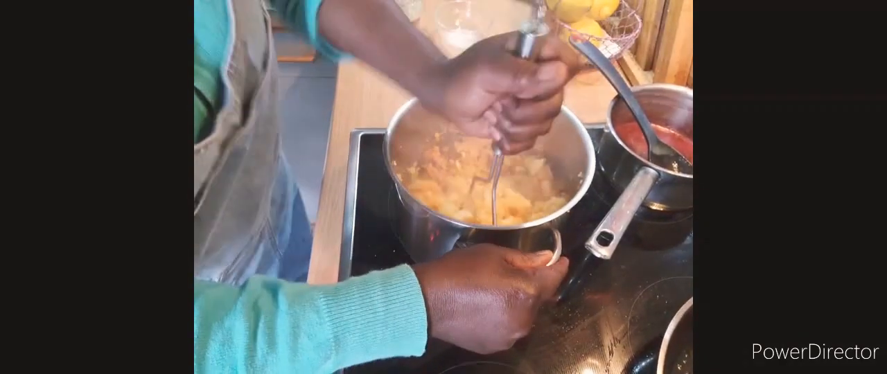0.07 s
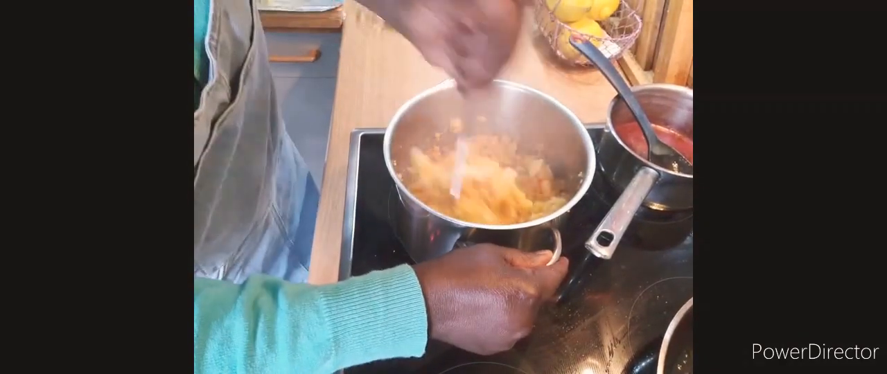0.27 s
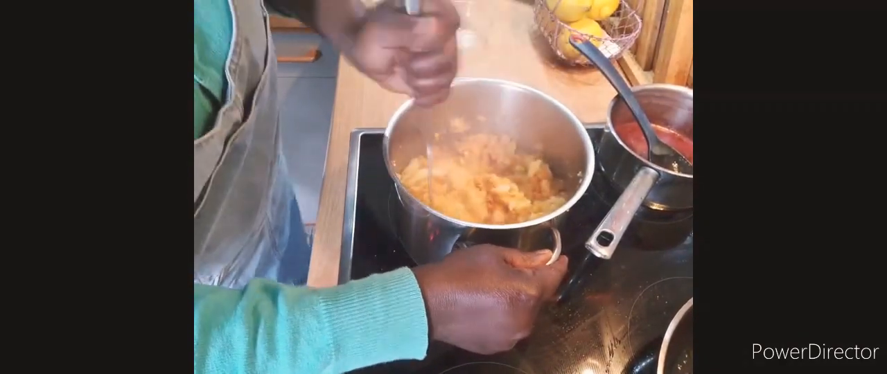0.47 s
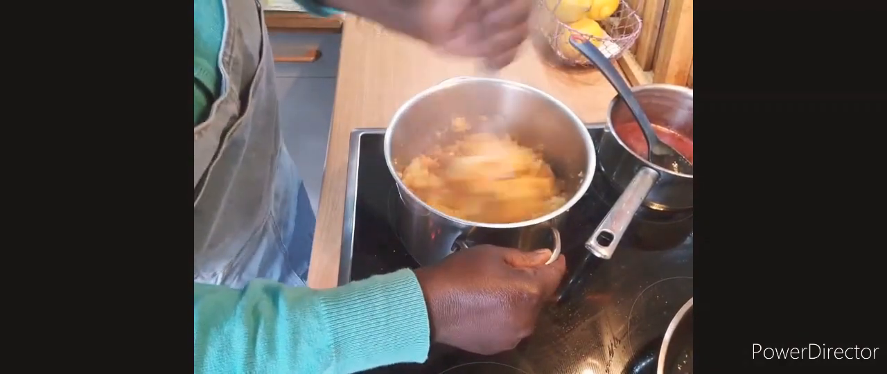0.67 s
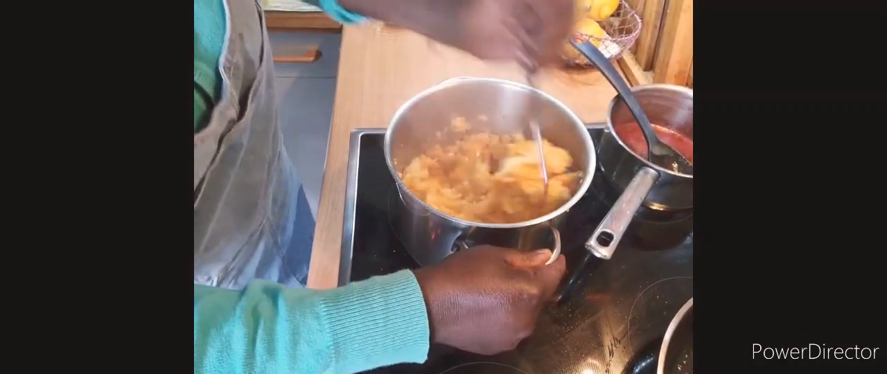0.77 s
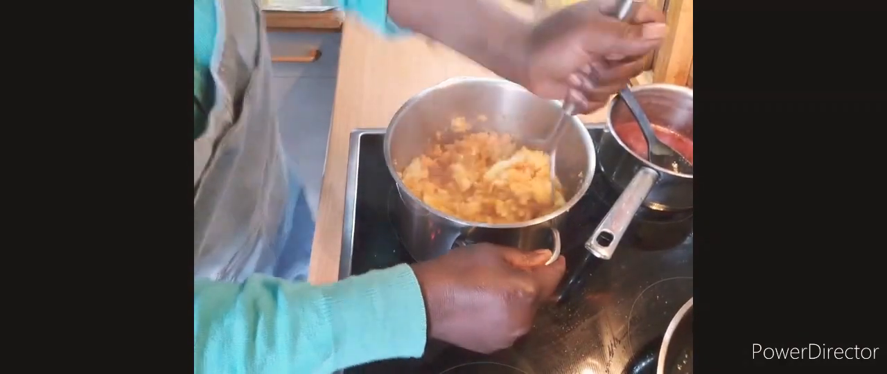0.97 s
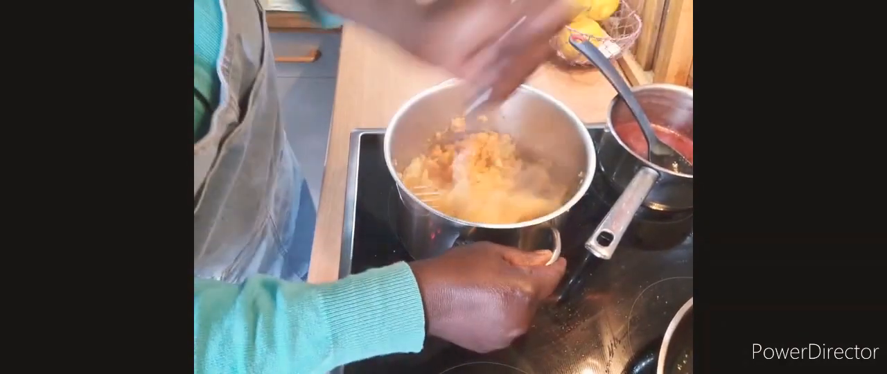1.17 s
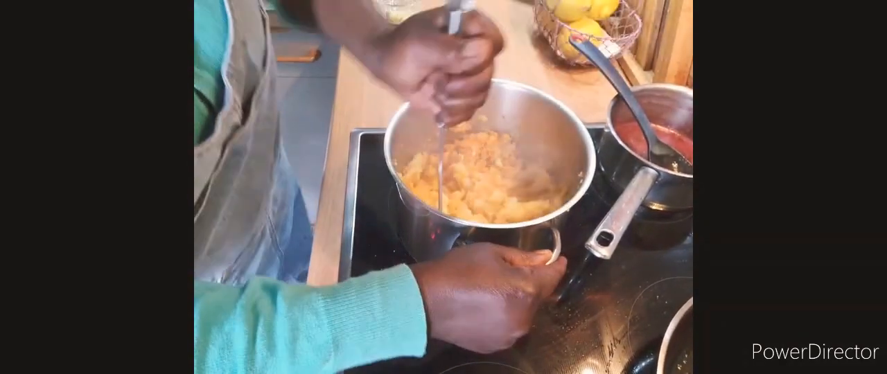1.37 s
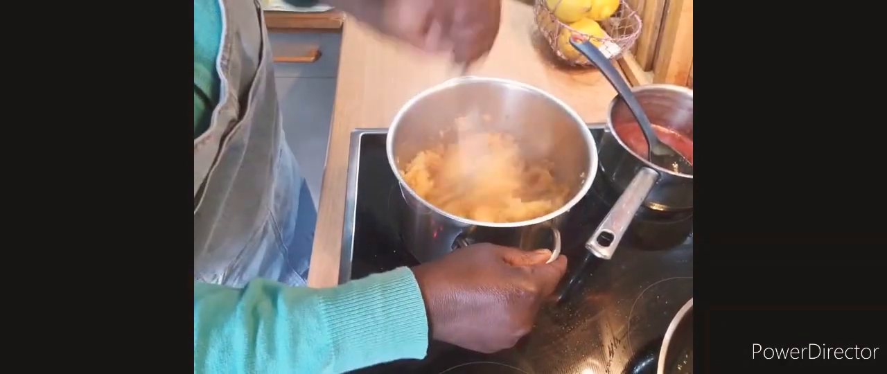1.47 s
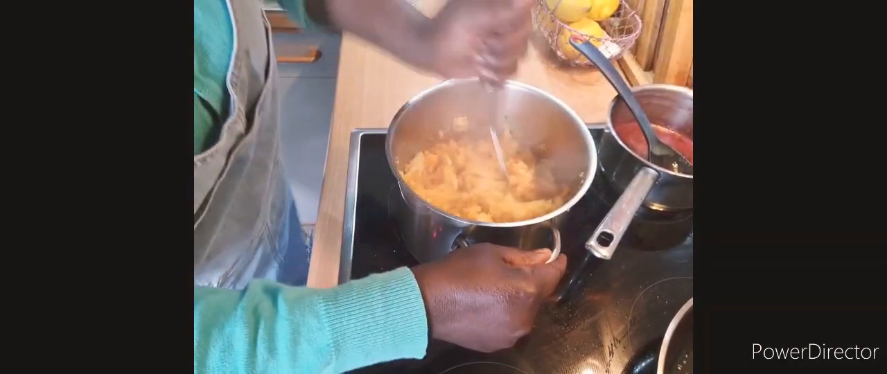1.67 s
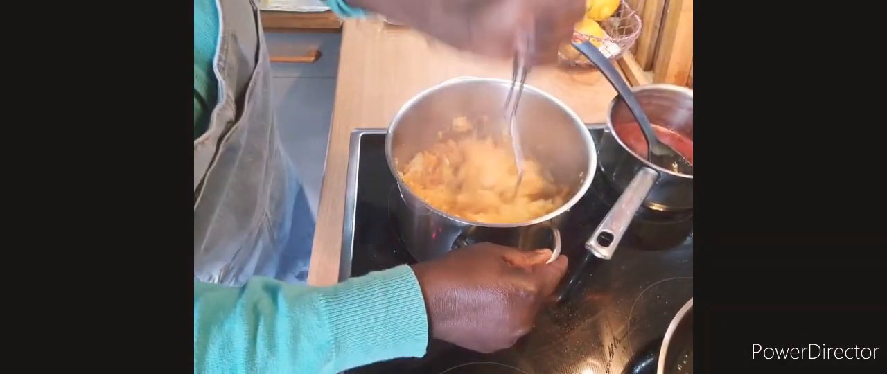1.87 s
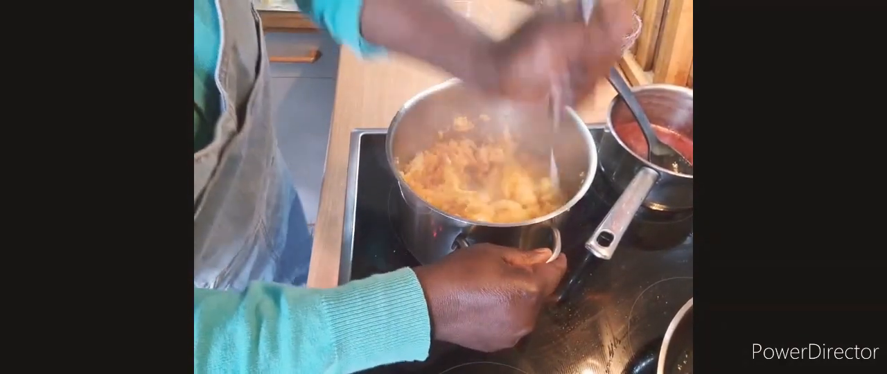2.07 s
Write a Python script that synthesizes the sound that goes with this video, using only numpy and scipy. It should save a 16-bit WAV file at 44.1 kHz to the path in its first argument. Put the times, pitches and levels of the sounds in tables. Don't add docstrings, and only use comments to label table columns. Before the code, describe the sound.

A hand masher pounds cooked vegetables in a steel pot, clanking the wall and thudding the bottom

```python
import sys
import numpy as np
from scipy import signal
from scipy.fft import rfft, irfft
from scipy.io import wavfile
from scipy.ndimage import uniform_filter1d, map_coordinates

SR = 44100
rng = np.random.default_rng(int(sys.argv[2]) if len(sys.argv) > 2 else 0)


def volts(x):
    e = np.asarray(x, float) / 20
    return 10 ** e


def bounce(signal):
    frames = np.transpose(np.atleast_2d(signal))
    limited = np.clip(frames, -1, 1)
    pcm = np.round(limited * 32767).astype(np.int16)
    wavfile.write(sys.argv[1], SR, pcm)


N = 93888
T = np.arange(N) / SR
PATCHY_DB = 4

# start_s, level_db, contact_s, thump_db, mash_hiss_db
BOTTOM_HITS = [
    (0.0627, -7.5, 0.0063, -11.5, -30),
    (0.5026, -14.5, 0.006, -12.5, -18),
    (0.9227, -6, 0.0079, -5.5, -28.5),
    (1.3144, -15.5, 0.0061, -10.5, -19.5),
    (1.761, -13, 0.008, -17, -26),
]
# freq_hz, density_db (per Hz)
RUB_COLOUR = [(60, 1), (150, -2), (600, -3.5), (1500, -16), (3000, -3.5), (5000, -8.5), (7200, -10),
              (14000, -7)]


def unit(x):
    return x / np.sqrt(np.mean(x ** 2))


def noise(colour):
    hz, db = np.array(colour).T
    f = np.maximum(np.arange(N // 2 + 1) * SR / N, 1)
    gain = volts(np.interp(np.log(f), np.log(hz), db))
    return unit(irfft(rfft(rng.standard_normal(N)) * gain, N))


def topped(colour, top_db):
    return [(hz, db + top_db * (hz > 8000)) for hz, db in colour]


def walk(rate_hz):
    k = int(SR / rate_hz)
    return uniform_filter1d(np.repeat(rng.standard_normal(N // k + 1), k), k)[:N]


def fade(s, tau, rise=0.00027):
    u = np.maximum(T - s, 0)
    return (1 - np.exp(-u / rise)) * np.exp(-u / tau)


def hold(s, length, rise, end):
    return np.clip((T - s) / rise, 0, 1) * np.exp(-np.maximum(T - s - length, 0) / end)


def ring(x, peaks):
    out, total = 0, 0
    for hz, width, db in peaks:
        mode = signal.lfilter(*signal.iirpeak(hz, hz / width, SR), x)
        out = out + volts(db + PATCHY_DB * walk(39.96)) * mode
        total += width * volts(2 * db)
    return out * np.sqrt(SR / np.pi / total)


def strike(s, contact, peaks, rise, cycles=0.):
    out, a = np.zeros(N), int(s * SR)
    u = np.maximum(T[a:a + SR // 4] - s, 0)
    for hz, width, db in peaks:
        drift = np.cumsum(uniform_filter1d(rng.standard_normal(SR // 4), size=40))[:len(u)]
        waver = drift * np.sqrt(2 * np.pi * width / SR)
        swell = 1 - np.exp(-u / (rise + cycles / max(hz, 600)))
        decay = np.exp(-u / (contact + 1 / (np.pi * width)))
        out[a:a + len(u)] += volts(db) * swell * decay * np.sin(2 * np.pi * hz * u + waver)
    return out * np.sqrt(2 / sum(volts(2 * db) for _, _, db in peaks))


def blow(s, db, contact, peaks, top_db):
    # freq_hz, density_db (per Hz)
    crack_colour = [(60, -33.5), (150, -36.5), (700, -23.5), (1800, -8.5), (3500, -7.5), (7200, -1),
                    (9000, -2.5), (14000, -1.5)]
    crack = fade(s, contact) * noise(topped(crack_colour, top_db))
    steel = strike(s, contact / 2, peaks, rise=0.00047, cycles=2)
    return volts(db) * (crack + volts(1.5) * steel)


def knocks():
    # start_s, level_db, contact_s, scrape_db, scrape_length_s
    wall_hits = [
        (0.448, -1.5, 0.009, -22.5, 0.064),
        (0.845, -7, 0.0046, -25.5, 0.13),
        (1.2165, -2, 0.0051, -16.5, 0.094),
        (1.2455, -5, 0.0058, -51, 0.026),
        (1.6087, -3.5, 0.0047, -16.5, 0.1417),
        (2.0453, -3.5, 0.0067, -20.5, 0.07),
    ]
    # freq_hz, width_hz, level_db
    wall_modes = [
        [(631, 34, -7), (1110, 63, 6.5), (2656, 147, -8), (3210, 90, -22), (3790, 100, -7), (5380, 220, 0),
         (7550, 920, -8)],
        [(130, 34, -14), (878, 82, -1), (1063, 50, 3), (1616, 53, -7.5), (3190, 110, -3.5), (3767, 120, 1.5),
         (5000, 460, -21.5)],
        [(1740, 270, -3.5), (2900, 260, 4), (3844, 250, 1.5), (4820, 620, -1), (7280, 270, 5.5)],
        [(800, 180, -13), (1067, 77, 1), (2414, 150, -4), (2900, 55, -19.5), (3550, 250, -6), (7200, 370, 1)],
        [(147.6, 79, -7), (608, 69, -11), (1980, 80, -8.5), (2900, 167, 0.5), (3880, 214, -2.5),
         (4240, 120, -12), (6970, 170, 2.5)],
        [(130, 140, -9.5), (610, 150, -8), (812, 94, -5), (1339, 210, 1.5), (2182, 136, -6.5),
         (3930, 180, -2.5), (6350, 1200, 0.5)],
    ]
    # freq_hz, width_hz, level_db
    scrape_modes = [
        [(627, 78, -3), (1133, 72, -5.5), (2900, 380, -5), (3700, 200, -8), (5600, 270, -10.5),
         (7330, 430, -6.5)],
        [(450, 150, 3.5), (900, 250, 1.5), (1500, 250, -3), (3000, 300, -8), (3800, 250, -6), (7200, 600, -8)],
        [(880, 410, -7.5), (1750, 240, -3.5), (2900, 380, -0.5), (3500, 200, -2), (6500, 300, 1)],
        [(1000, 200, 5), (3000, 300, -3)],
        [(600, 100, -15), (1880, 98, -11.5), (2942, 130, 3), (3930, 160, 1), (4620, 120, -1), (6785, 230, -0.5),
         (7570, 160, 1)],
        [(366, 100, -3), (630, 120, 3.5), (813, 82, -2), (1323, 150, 2), (2900, 200, -6), (3750, 160, -3.5),
         (5150, 170, -6), (7170, 500, -3.5)],
    ]
    climbs = [0.012, 0.012, .16, .01, .02, .01]
    wall_tops = [-2.5, -8, -3, 1, 1.5, -3]
    out = 0
    for hit, peaks, rubbed, climb, top_db in zip(wall_hits, wall_modes, scrape_modes, climbs, wall_tops):
        s, db, contact, scrape_db, length = hit
        out = out + blow(s, db - 7.5, contact, peaks, top_db)
        sag_db = 15.5 * (1 - np.exp(-np.maximum(T - s, 0) / 0.056))
        slide_db = db + scrape_db - sag_db + 1.5 * walk(120)
        slide = hold(s, length, 0.00077, 0.0062) * volts(slide_db)
        out = out + slide * noise(topped(RUB_COLOUR, top_db))
        pace = np.cumsum(1 + climb * np.clip((T - s) / length, 0, 1) ** 2)
        steel = map_coordinates(ring(rng.standard_normal(N), rubbed), [pace], mode="mirror")
        out = out + volts(-1) * slide * steel
    return out


def thuds():
    # freq_hz, width_hz, level_db
    bottom_modes = [
        [(1625, 88, -7), (2740, 154, -5), (3856, 180, -3), (7500, 545, 4)],
        [(1130, 200, 12), (4040, 80, -23), (4840, 47, -2), (7440, 300, 16)],
        [(2594, 250, -12.5), (3696, 210, -10), (5450, 260, -10.5), (4800, 300, -18), (7100, 250, -5)],
        [(4110, 130, -16.5), (4803, 150, -16.5), (7500, 93, -21), (8300, 240, -12.5)],
        [(2150, 290, -21), (4040, 360, -11), (6490, 250, -34), (7440, 550, -15.5)],
    ]
    bottom_tops = [3, 2, -5, 4.5, 10]
    thump_modes = [(147.9, 94, 0), (330, 60, -10)]  # freq_hz, width_hz, level_db
    hiss_t60_s = 0.31
    out = 0
    for hit, peaks, top_db in zip(BOTTOM_HITS, bottom_modes, bottom_tops):
        s, db, contact, thump_db, hiss_db = hit
        out = out + blow(s, db - 6.0, contact, peaks, top_db)
        out = out + volts(db + thump_db) * strike(s, 0.0086, thump_modes, rise=0.0048)
        squeeze = noise(topped(RUB_COLOUR, min(top_db, 0)))
        thin = signal.lfilter(*signal.butter(1, 700, "high", fs=SR), squeeze)
        out = out + volts(db + hiss_db + 2 * walk(74)) * fade(s, hiss_t60_s / np.log(1000)) * thin
    return out


def worktop():
    # start_s, level_db, rise_s, t60_s, pitch_hz
    booms = [
        (0.064, -12.5, 0.02, 0.59, 51),
        (0.502, -18, 0.036, 0.78, 50.35),
        (0.919, -3.5, 0.022, 0.48, 50.65),
        (1.305, -13, 0.041, 0.55, 50.54),
        (1.76, -17.5, 0.029, 0.49, 48.4),
    ]
    # start_s, share_cancelled (over 1 turns it round)
    pulls = [
        (0.259, 0.95),
        (0.648, 0.49),
        (1.132, 1.77),
        (1.41, 1.26),
        (1.828, 1.42),
    ]
    # freq_hz, width_hz, level_db
    loose_modes = [(106, 32, 16.5), (135, 22, -3.5), (229, 390, -14.0), (350, 170, -13), (800, 1100, -19.5)]
    pull_s, turn, rattle_db, slam_db = 0.056, 1.46, -24, -8
    out = volts(-48 + 2 * walk(2.4)) * np.sin(2 * np.pi * 51 * T)
    for (s, db, rise, t60, hz), (start, share), thud in zip(booms, pulls, BOTTOM_HITS):
        swell = 1 - np.exp(-np.maximum(T - s, 0) / rise)
        swing = volts(db) * fade(s, t60 / np.log(1000), rise=rise) * swell
        pull = share * np.sin(np.pi / 2 * np.clip((T - start) / pull_s, 0, 1)) ** 2
        swing = swing * (1 - pull + 1j * turn * pull * max(share - .9, 0))
        out = out + (swing * np.exp(2j * np.pi * hz * (T - s))).imag
        slam = volts(2.2 * db + slam_db) * fade(thud[0], 0.023, rise=0.0044)
        shake = ring(rng.standard_normal(N), loose_modes)
        out = out + (volts(rattle_db) * abs(swing) + slam) * shake
    return out


def lifts():
    # start_s, level_db, length_s, dullness_db (per octave)
    rustles = [
        (.0, -42.5, 0.1, 4.5),
        (0.21, -43.5, 0.045, 5.5),
        (0.275, -47, 0.033, -5),
        (0.62, -46, 0.057, 4),
        (1.034, -51, 0.11, 2),
        (1.448, -43, 0.021, 4),
        (1.488, -50, 0.044, -0.5),
        (1.871, -41.5, 0.012, 2),
        (1.887, -50, 0.052, -5),
    ]
    # freq_hz, density_db (per Hz)
    wet_colour = [(60, -24), (200, -23), (700, -8), (1500, -6), (3500, -8), (7300, -1), (9000, -6),
                  (14000, 0)]
    out = 0
    for s, db, length, dull_db in rustles:
        wet = noise([(hz, d - dull_db * np.log2(hz / 2000)) for hz, d in wet_colour])
        out = out + hold(s, length, 0.0052, 0.019) * volts(db + 2 * walk(200)) * wet
    return out


def ticks():
    # start_s, level_db, pitch_hz, width_hz, fall_s
    taps = [(0.0345, -30, 1586, 231.5, 0.0034), (0.209, -31, 1300, 539, 0.0026),
            (0.613, -41.5, 6850, 3500, 0.001), (1.063, -36.5, 1445, 376, 0.035),
            (1.853, -36, 6500, 3955, 0.0027), (1.879, -35, 2185, 322, 0.0054), (.476, -18, 1110, 111, .005),
            (0.757, -39, 130, 49, 0.0034), (1.254, -17, 1100, 150, 0.0069), (1.623, -24, 2900, 320, 0.0044),
            (.0, -42, 2400, 800, 0.026), (.912, -29, 1870, 1200, 0.015), (.664, -36, 7500, 1200, .002),
            (.684, -41, 6800, 3000, .0015), (.923, -11, 199.4, 61, .004), (.944, -21, 330, 40, .006),
            (1.2188, -7, 5000, 5000, .0009), (1.232, -19, 7200, 500, .003), (1.62, -17.5, 6000, 5000, .003),
            (1.925, -45, 11000, 5000, .002), (2.0424, -30, 5000, 5000, .002), (.49, -26, 1130, 69, .008),
            (.755, -50.5, 2200, 1980, 0.0034), (1.458, -43.5, 1110, 300, .005)]
    out = 0
    for s, db, hz, width, fall in taps:
        if width > hz / 2.5:
            click = ring(fade(s, fall) * rng.standard_normal(N), [(hz, width, 0)])
        else:
            click = strike(s, fall / 2, [(hz, width, 0)], rise=0.00097)
        out = out + volts(db) * click
    return out


def drag():
    # freq_hz, width_hz, level_db, glide_share_of_pitch
    partials = [(1090, 200, -1, 0), (1750, 200, -6, -.02), (2400, 200, -3, .02), (2850, 200, -8, -.02),
                (3150, 60, -2, .1), (5530, 60, -9, 0)]
    start_s, length_s = .756, 0.045
    u = np.clip((T - start_s) / length_s, 0, 1)
    out = 0
    for hz, width, db, glide in partials:
        rough = signal.lfilter(*signal.butter(2, width / 2, fs=SR), rng.standard_normal((2, N)))
        phase = 2 * np.pi * np.cumsum(hz * (1 + glide * np.sqrt(u))) / SR
        out = out + volts(db + PATCHY_DB * unit(rough[0])) * np.sin(phase + unit(rough[1]))
    return volts(-46.5 - 5.8 * u) * hold(start_s, length_s, 0.0016, 0.016) * out / 2


def room(x):
    t60_s, level_db, dull_hz = 0.37, -15.5, 5640
    t = T[:SR // 2]
    tail = rng.standard_normal((2, len(t))) * (t > .004)
    low = signal.lfilter(*signal.butter(1, dull_hz, fs=SR), tail[0]) * volts(-60 * t / t60_s)
    h = low + 0.13 * tail[1] * volts(-60 * t / (1.1 * t60_s))
    h = signal.lfilter(*signal.butter(2, 200, "high", fs=SR), h)
    return volts(level_db) * signal.fftconvolve(x, h / np.sqrt(np.sum(h ** 2)))[:N]


def floor():
    # freq_hz, density_db (per Hz)
    floor_colour = [(60, -6), (110, -2.5), (250, -23), (1100, -29.5), (2200, -38), (7000, -30), (9000, -27),
                    (14000, -27.5)]
    return volts(-56 + 2 * walk(21)) * noise(floor_colour)


def scene():
    near = knocks() + thuds() + lifts() + ticks() + drag()
    return (near + worktop() + room(near) + floor())[None]


def band_limit(x):
    return signal.sosfilt(signal.butter(12, 14670, fs=SR, output="sos"), x)


def record(dry):
    shelf_hz, shelf_db, top_hz = 7850, -5.5, 13950
    f = np.arange(N // 2 + 1) * SR / N
    dull = irfft(rfft(dry) * volts(shelf_db / (1 + np.exp((shelf_hz - f) / 150))), N)
    top_cut = signal.ellip(8, .2, 40, top_hz, fs=SR, output="sos")
    mix = signal.sosfilt(top_cut, np.tanh(dull))
    return band_limit(mix)


dry = scene()
out = record(dry)
bounce(out)
```